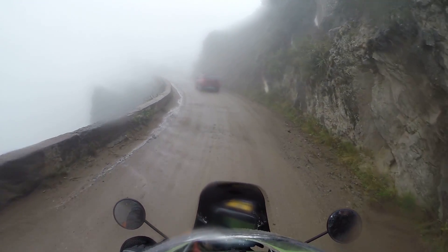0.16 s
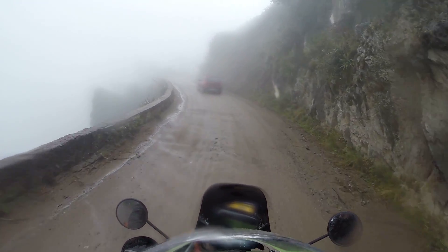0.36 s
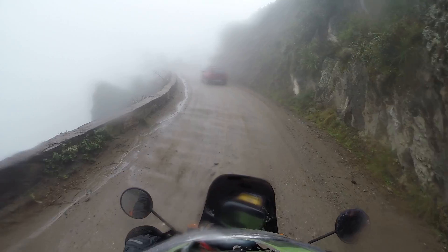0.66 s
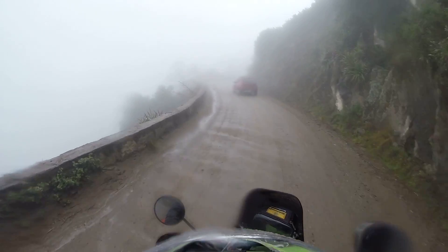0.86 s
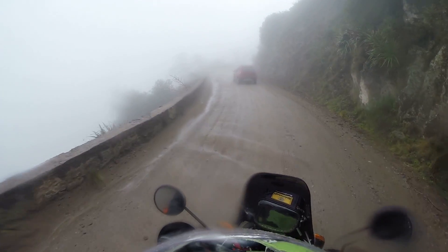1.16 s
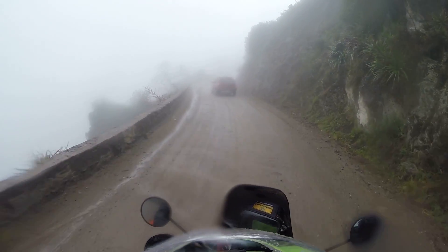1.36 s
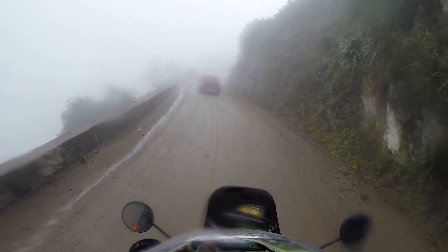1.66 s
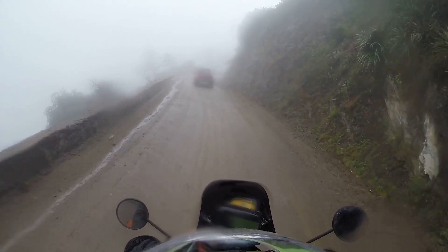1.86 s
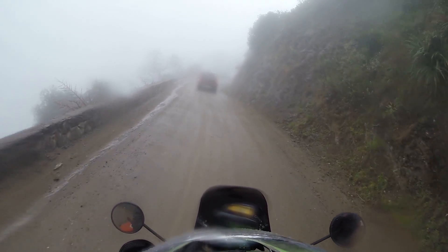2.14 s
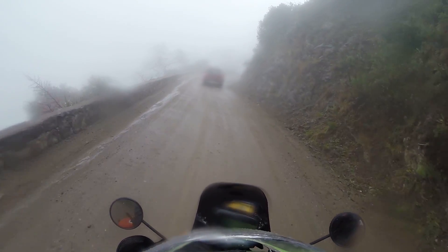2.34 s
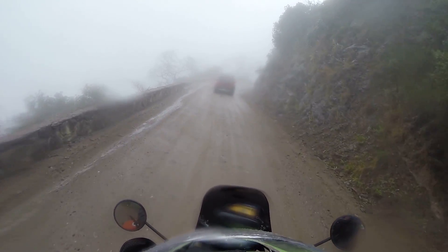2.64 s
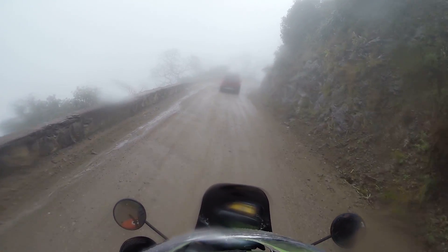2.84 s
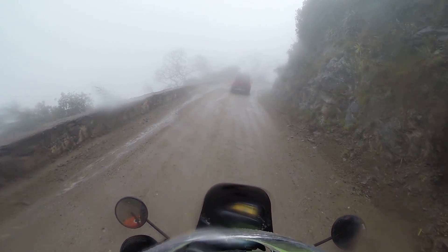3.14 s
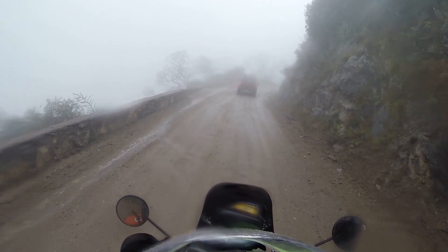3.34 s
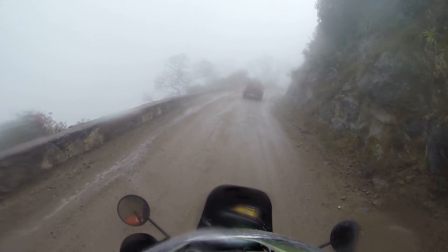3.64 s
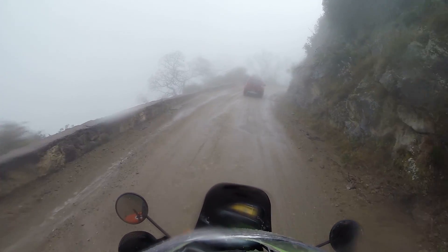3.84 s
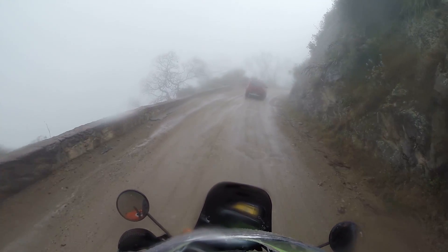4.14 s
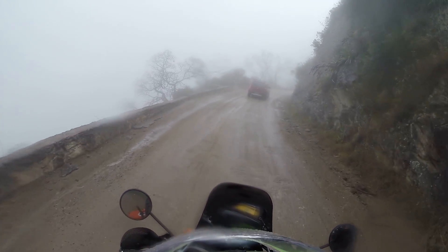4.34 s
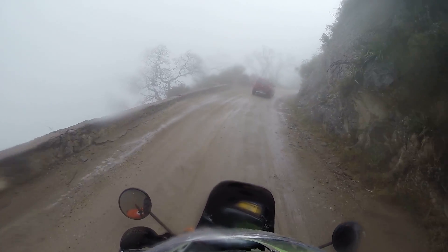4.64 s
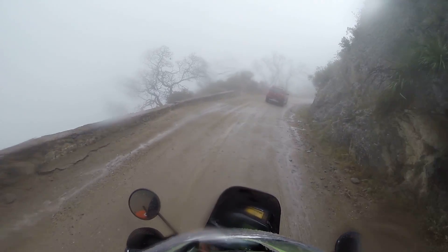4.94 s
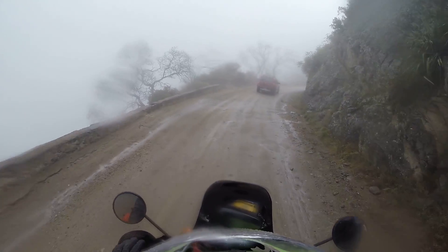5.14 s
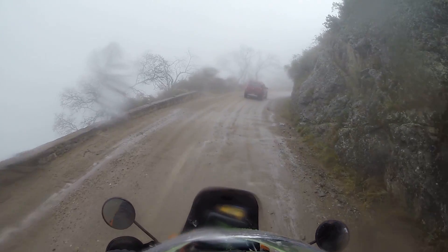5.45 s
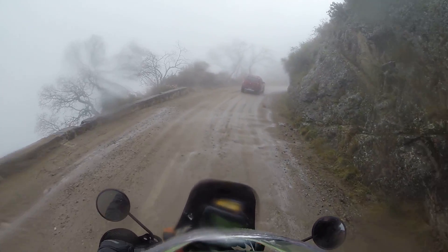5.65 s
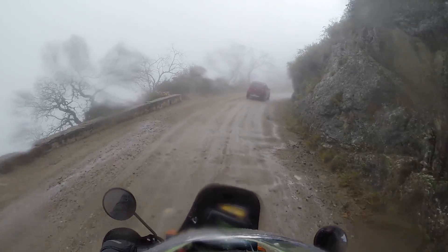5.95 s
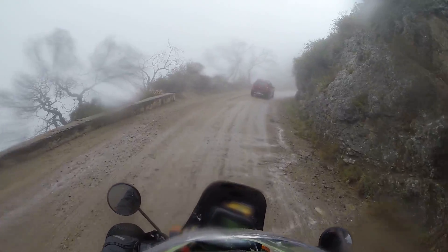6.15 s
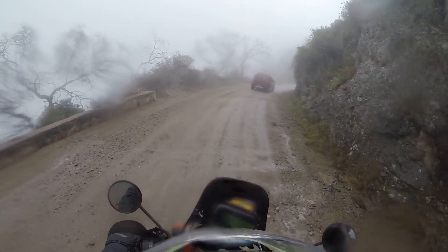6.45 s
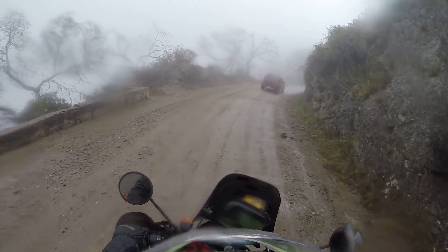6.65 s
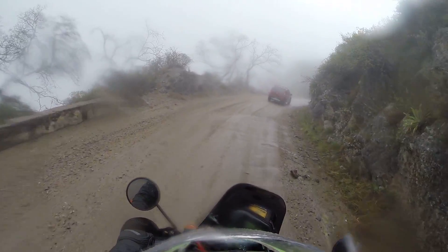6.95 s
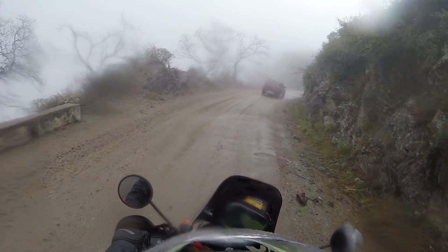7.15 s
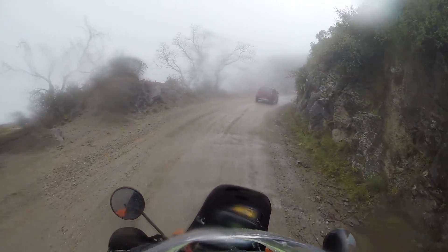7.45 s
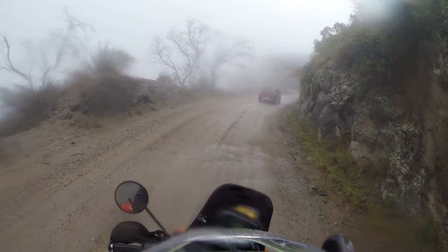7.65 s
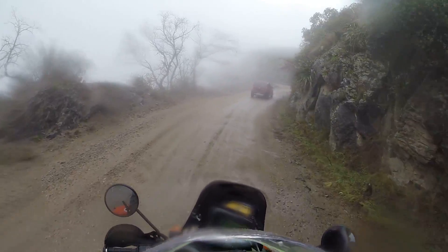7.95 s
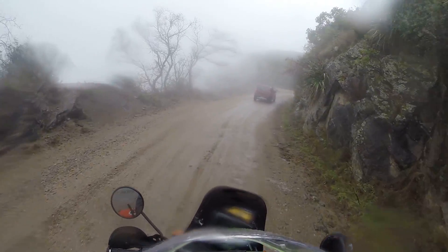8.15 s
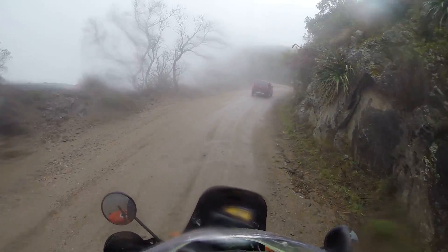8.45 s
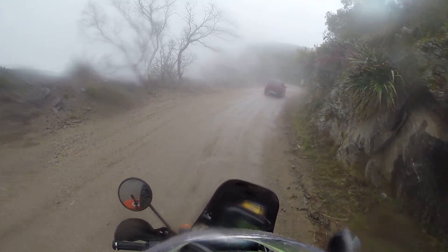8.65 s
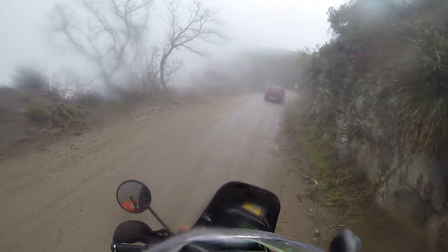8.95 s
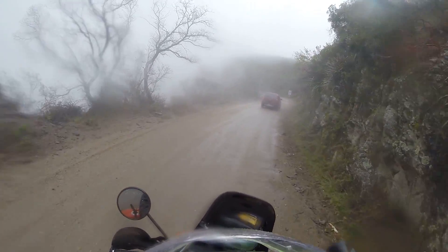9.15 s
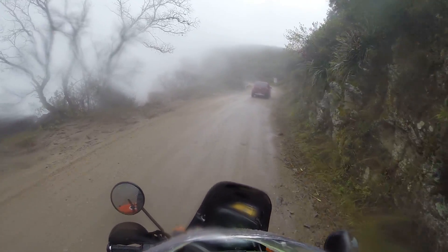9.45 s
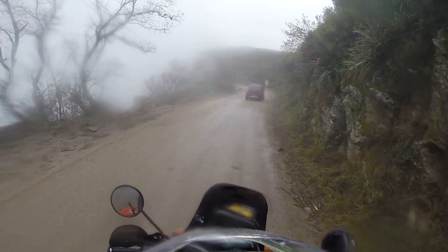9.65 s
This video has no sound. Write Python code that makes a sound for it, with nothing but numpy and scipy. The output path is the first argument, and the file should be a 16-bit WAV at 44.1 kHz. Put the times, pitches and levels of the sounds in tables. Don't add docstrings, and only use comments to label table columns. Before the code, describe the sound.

A camera mounted on a single-cylinder motorcycle picks up constant low thudding rumble from the gravel road, wind whistling through housing gaps, and fine wet hiss. The engine hums weakly, sagging in pitch midway and then recovering. Drops and grit tick on the shell, with a few loud short plastic clacks, the hardest at about 3.6 seconds. The sound is close and boxed in, without echo.

```python
import sys
import numpy as np
from scipy import signal
from scipy.fft import rfft, irfft, next_fast_len
from scipy.io import wavfile
from scipy.ndimage import uniform_filter1d, map_coordinates

SR = 44100
rng = np.random.default_rng(int(sys.argv[2]) if len(sys.argv) > 2 else 0)


def to_wav(sig):
    pcm = np.clip(np.atleast_2d(sig), -1, 1) * 32767
    pcm = np.round(pcm).astype(np.int16)
    wavfile.write(sys.argv[1], SR, pcm.T)


def attenuation_scalar(level_db):
    decades = np.asarray(level_db, float) / 20
    return 10 ** decades


N = 432180

# pitch_hz, width_hz, level_db
MOUNT_MODES = [
    [(49, 5, 0), (60, 6, -8)],
    [(34, 5, 0)],
]
# centre_s, level_db, length_s
JOLTS = [(0.215, -33, 0.096), (0.437, -37, 0.17), (0.707, -41, 0.082), (1.1, -35.5, 0.3),
         (1.686, -32.5, 0.068), (1.91, -43, 0.21), (2.15, -35, 0.16), (2.463, -34.5, 0.14),
         (2.66, -42.5, 0.18), (3.115, -35, 0.079), (3.323, -40, 0.066), (3.492, -53, 0.055),
         (3.68, -30.5, 0.068), (3.88, -32.5, 0.066), (4.18, -35, 0.2), (4.626, -36.5, 0.41),
         (5.12, -36.5, 0.058), (5.493, -37.5, 0.33), (5.83, -36.5, 0.15), (6.13, -35.5, 0.16),
         (6.372, -36, 0.08), (6.614, -37, 0.18), (6.923, -38.5, 0.13), (7.28, -37.5, 0.32),
         (7.85, -36.5, 0.3), (8.056, -36.5, 0.085), (8.36, -33, 0.22), (8.746, -35, 0.21),
         (9.114, -33, 0.49), (9.75, -37, 0.24)]
# centre_s, level_db, length_s
SWAYS = [(0.086, -35.5, 0.16), (0.373, -37, 0.2), (0.67, -56, 0.081), (1.086, -36.5, 0.14),
         (1.59, -35, 0.37), (2.13, -38.5, 0.14), (2.504, -33.5, 0.32), (3.13, -49, 0.41),
         (3.36, -35.5, 0.22), (3.65, -53, 0.083), (4.14, -40.5, 0.31), (4.58, -39, 0.14),
         (5.285, -46, 0.35), (5.576, -41, 0.11), (5.82, -36, 0.17), (6.18, -35.5, 0.19),
         (6.55, -40.5, 0.096), (6.97, -42.5, 0.44), (7.306, -40, 0.21), (7.49, -37, 0.1), (7.92, -37, 0.38),
         (8.084, -41, 0.06), (8.484, -34.5, 0.24), (9.0, -33, 0.29), (9.268, -37, 0.11),
         (9.562, -37.5, 0.24)]
CALM_DB = -49, -50.5
# time_s, firing_rate_hz, level_db, upper_order_bark_db
ENGINE_RIDE = [(0, 29.32, -57.5, -2), (1.2, 29.65, -57.5, -5), (2.2, 28.12, -59, -8.5),
               (3.2, 26.54, -58.5, -5), (4.5, 24.52, -62, -4), (5.3, 24.97, -61, -7), (6.2, 26.02, -65, 1),
               (7.3, 27.35, -66.5, 2.5), (8, 27.68, -66, 6), (9.8, 28.57, -58.5, -3.5)]
# multiple, level_db
FIRING_ORDERS = [(3, -0.5), (4, 0), (5, -15.5), (6, -12), (7, -13), (8, -7.5), (9, -5), (10, -7),
                 (11, -11.5), (12, -14)]
# time_s, gap_wind_db, tyre_spray_db
RIDE = [(0.0, -48, -52.0), (0.58, -50.5, -53.5), (0.98, -48, -52.5), (1.38, -49.5, -53.5),
        (2.37, -44, -54.5), (2.72, -50, -55), (3.18, -53.5, -56.0), (3.48, -49, -55.5),
        (4.08, -53.5, -56.5), (5.37, -51.5, -56.0), (5.58, -48, -55.5), (6.18, -47, -55.5),
        (7.42, -47, -54), (7.66, -44, -54.5), (8.6, -46.5, -53.5), (8.78, -46.5, -54.0),
        (9.8, -45.5, -55.5)]
# centre_s, change_db, length_s
PUFFS = [(0.078, -3, .06), (0.234, 7, 0.085), (.37, 1.5, 0.046), (.68, -2, .13), (1.13, 2, 0.092),
         (1.463, 3, 0.074), (1.595, -7.5, 0.074), (1.694, 4, 0.1), (1.89, -3, .1), (2.037, -5, 0.1),
         (2.36, -0.5, 0.074), (2.593, -7.5, 0.085), (2.907, -6, 0.12), (3.05, 8, 0.14), (3.31, -3, 0.1),
         (4.95, -2, 0.18), (5.327, 2, .08), (5.625, 3, 0.045), (5.695, 4, .04), (5.854, 3.5, 0.098),
         (6.41, -3.5, 0.065), (7.196, -2, 0.08), (7.575, 1.8, 0.17), (8.38, 4, 0.25), (8.569, 3.5, 0.1),
         (8.778, -4, .1), (9.167, -3, 0.22), (9.248, 4.5, 0.067), (9.652, 1.5, 0.066)]
# pitch_hz, density_db (per Hz)
RUMBLE_SPECTRUM = [(35, -35), (60, -3.5), (72, -16), (76, -18.5), (377, -26.5), (524, -31), (621, -32.5),
                   (1100, -33), (1430, -66), (2420, -120)]
# pitch_hz, width_hz, level_db
FRAME_MODES = [(141, 3.9, 7), (526, 22.6, 7.5)]
# pitch_hz, width_hz, level_db
GAP_MODES = [(1122, 86, -10), (1444, 129, 3), (1597, 430, -7.5)]
# pitch_hz, width_hz, level_db
OVERTONE_MODES = [(2400, 790, -6.5), (2919, 195, 3), (3580, 400, -10)]
# centre_s, extra_db, length_s
GRAVEL = [
    (1.03, 3, 0.39),
    (5.33, 6, .08),
    (8.45, 3.5, 0.31),
]
# pitch_hz, density_db (per Hz)
HISS_SPECTRUM = [(600, -17), (1000, -13.5), (1700, -7), (2500, -8.5), (3600, -13.5), (4300, -19.5),
                 (5000, -14.5), (6800, -14.5), (7600, -30.5), (11000, -33), (13300, -35), (14000, -40),
                 (15250, -39), (15400, -90)]
# pitch_hz, width_hz, level_db
PORT_MODES = [(5210, 84, -3.5), (8430, 320, -5), (9500, 220, -1), (10210, 180, 5.5)]
# start_s, peak_db, dull_db, bright_db
TICKS = [(0.0744, -46, -8, -17), (0.154, -36, 9.5, -23), (0.7431, -53, 0, -9), (1.1901, -35.5, -13, -21),
         (1.6101, -46, 0, -7), (1.727, -43, -11, -17), (1.875, -39, -9, -24), (1.982, -46, 11, -23),
         (2.13, -51, 3, -20), (2.535, -35, -12, -28), (2.8793, -40, -17, -18), (2.9237, -48, -8, -12),
         (3.543, -49.5, 0, -6), (3.792, -39, 3, -25), (4.157, -37, -10, -22), (4.2129, -37.5, -8, -23),
         (4.82, -48, -7, -13), (4.9925, -48, 2, -12), (7.496, -50, -3, -5), (8.3516, -35, -18, -38),
         (8.5199, -39, -12, -30), (8.6777, -33, 0, -32), (8.698, -35, -2, -26), (8.892, -43, 0, -16)]
# start_s, peak_db, dull_db, bright_db, dull_note_hz
FACE_HITS = [
    (0.5739, -18.5, -5.5, -32, 2090),
    (2.031, -43, 3, -11, 3900),
    (3.6481, -16, -4.5, -18, 3000),
    (5.181, -30.5, -8, -26, 2450),
    (7.7031, -27.5, 9, -26, 2950),
    (9.7756, -39, -10, -20, 1930),
]
# start_s, peak_db, dull_db, bright_db, dull_note_hz
RIM_HITS = [
    (6.7542, -20, -9, -28, 2900),
    (7.098, -23, -0.5, -26.5, 1470),
    (7.1348, -28, 1.5, -25, 2400),
    (8.7349, -29.5, 3.5, -18, 1900),
    (9.6349, -27, -5, -17.5, 2400),
]
# pitch_hz, width_hz, level_db
SHELL_DULL = [(1450, 450, -5.5), (2450, 800, 0), (3370, 370, 0.5)]
# pitch_hz, width_hz, level_db
SHELL_MID = [(4400, 750, -13), (5830, 1600, -6), (6700, 510, -7)]
# pitch_hz, width_hz, level_db
SHELL_BRIGHT = [(8300, 910, 2.5), (10000, 420, 1.5), (11900, 1400, 1), (13000, 2400, -6), (14600, 1500, -8)]
# pitch_hz, width_hz, level_db
FACE_NOTE = [(5240, 330, 4.3)]
# pitch_hz, width_hz, level_db
RIM_NOTE = [(5330, 600, -2), (6470, 710, -3)]
# start_s, peak_db
KNOCKS = [(0.156, -39), (0.946, -33), (1.045, -34), (1.1278, -32), (1.8162, -31), (1.982, -26.5),
          (4.58, -34), (4.684, -34.5), (5.331, -29), (5.628, -35), (5.842, -35), (6.8472, -30.5),
          (8.319, -36)]
# start_s, peak_db
POTHOLES = [
    (0.896, -34.5),
    (1.701, -46),
    (5.717, -41),
    (8.5, -44.5),
]
# start_s, level_db, pitch_hz
PINGS = [
    (.947, -34, 2350),
    (1.096, -35, 2350),
    (1.1495, -33, 2450),
    (1.965, -38, 2250),
    (2.0322, -31, 2550),
]
# start_s, then a list of pitch_hz, level_db, t60_s
STONE = (3.6492, [(2240, -28.5, 0.045), (2520, -28, 0.029), (2920, -38, 0.023)])


def unit(x):
    return x / np.sqrt(np.mean(x ** 2) + 1e-20)


def curves(rows):
    s, *cols = np.transpose(rows)
    return [np.interp(np.arange(N) / SR, s, c) for c in cols]


def swells(rows, heights):
    t = np.arange(0, N + 100, 100) / SR
    s, _, length = np.transpose(rows)[:, :, None]
    bells = np.exp(-(2 * (t - s) / length) ** 2)
    return np.interp(np.arange(N) / SR, t, heights @ bells)


def wobble(rate):
    knots = rng.standard_normal(int(N * rate / SR) + 4)
    return map_coordinates(knots, [np.arange(N) * rate / SR])


def filtered(x, response):
    m = next_fast_len(N + SR // 2)
    return irfft(rfft(x, m) * response(np.fft.rfftfreq(m, 1 / SR)), m)[:N]


def colour(points):
    hz, db = np.transpose(points)
    return lambda f: attenuation_scalar(np.interp(np.log(f + 1), np.log(hz + 1), db))


def resonances(modes):
    def response(f):
        total = 0
        for k, (c, w, db) in enumerate(modes):
            total = total + (-1) ** k * attenuation_scalar(db) * 1j * f * w / (c * c - f * f + 1j * f * w)
        return total
    return response


def lifted(points, modes):
    return lambda f: colour(points)(f) * (1 + np.abs(resonances(modes)(f)))


def turbulence(patchy_db, top_db=0):
    z = signal.stft(rng.standard_normal(N), nperseg=512)[2]
    field = uniform_filter1d(uniform_filter1d(rng.standard_normal(z.shape), 7, 0), 6, 1)
    depth_db = patchy_db + top_db * np.clip(np.linspace(-2, 2, len(z)), 0, 1)[:, None]
    return signal.istft(z * attenuation_scalar(depth_db * unit(field)), nperseg=512)[1][:N]


def clicks(count, spread_db):
    when, size = rng.random((count, 2)).T
    heights = attenuation_scalar(-spread_db * np.log(1 - .97 * size))
    return np.bincount((when * (N - 1)).astype(int), heights, N)


def mount():
    heave = colour([(3, -5.0), (10, -1.0), (22, -1.5), (30, -30), (60, -59)])
    out = attenuation_scalar(-46.5) * unit(filtered(rng.standard_normal(N), heave))
    for modes, rows, calm_db in zip(MOUNT_MODES, (JOLTS, SWAYS), CALM_DB):
        level = np.sqrt(attenuation_scalar(2 * calm_db) + swells(rows, attenuation_scalar(2 * np.transpose(rows)[1])))
        sway = unit(filtered(rng.standard_normal(N), resonances(modes)))
        power = uniform_filter1d(uniform_filter1d(sway ** 2, size=SR // 12), size=SR // 12)
        out = out + attenuation_scalar(1.0) * level * sway / np.sqrt(np.abs(power) + 0.019)
    return filtered(out, lambda f: 1 / (1 + (f / 66) ** 12))


def engine():
    rate_hz, level_db, bark_db = curves(ENGINE_RIDE)
    turn = 2 * np.pi * np.cumsum(rate_hz * (1 + .004 * wobble(6))) / SR
    tones = 0
    for k, db in FIRING_ORDERS:
        order_db = db + bark_db * (k > 6.5) + 3 * wobble(3.5)
        tones = tones + attenuation_scalar(order_db) * np.sin(round(k) * turn + k * k)
    return attenuation_scalar(level_db) * tones


def wind_rumble(wind_db):
    follows = 0.33
    level_db = -52 + follows * (wind_db - wind_db.mean()) + 0.92 * wobble(3.14)
    return attenuation_scalar(level_db) * unit(filtered(turbulence(patchy_db=0.06), lifted(RUMBLE_SPECTRUM, FRAME_MODES)))


def gap_whistle(wind_db, hiss_db, flutter):
    whistle_db = wind_db + swells(PUFFS, np.transpose(PUFFS)[1]) + 0.54 * wobble(16)
    overtone_db = -1.5 - 0.12 * (whistle_db - wind_db) + 0.56 * (hiss_db - hiss_db.mean())
    eddies = attenuation_scalar(0.19 * flutter + 0.93 * wobble(50)) * unit(turbulence(patchy_db=1.0))
    grit = attenuation_scalar(swells(GRAVEL, np.transpose(GRAVEL)[1])) * unit(clicks(count=4000, spread_db=2.5))
    eddies = eddies + 0.58 * grit

    def low_band(f):
        return resonances(GAP_MODES)(f) * f ** 2 / (f ** 2 + 900 ** 2) / (1 + (f / 2400) ** 6)

    def high_band(f):
        return resonances(OVERTONE_MODES)(f) * f ** 2 / (f ** 2 + 1800 ** 2) / (1 + (f / 4100) ** 8)

    low = unit(filtered(eddies, low_band))
    high = unit(filtered(eddies, high_band))
    return attenuation_scalar(whistle_db - 0.9) * (low + attenuation_scalar(overtone_db - 1.0) * high)


def shell_hiss(hiss_db, flutter):
    noise = attenuation_scalar(0.26 * flutter) * turbulence(patchy_db=1.2, top_db=3.5)
    return attenuation_scalar(hiss_db + 5.0) * unit(filtered(noise, lifted(HISS_SPECTRUM, PORT_MODES)))


def airflow():
    wind_db, hiss_db = curves(RIDE)
    flutter = wobble(22)
    return wind_rumble(wind_db) + gap_whistle(wind_db, hiss_db, flutter) + shell_hiss(hiss_db, flutter)


def spray():
    mist_modes = [(5300, 1500, 0), (9500, 3000, -6), (13000, 3000, -5)]  # Hz, width Hz, dB
    return attenuation_scalar(-52) * filtered(clicks(count=160, spread_db=3.0), resonances(mist_modes))


def shell_hits():
    out, t = np.zeros(N + SR), np.arange(2048) / SR
    f = np.fft.rfftfreq(len(t), 1 / SR)
    light = [(*row, 2800) for row in TICKS]
    blows = [(*row, FACE_NOTE) for row in FACE_HITS + light]
    blows += [(*row, RIM_NOTE) for row in RIM_HITS]
    bright = resonances(SHELL_BRIGHT)(f)
    for s, db, dull_db, bright_db, dull_hz, note in blows:
        crack = rfft(.12 * rng.standard_normal(len(t)) * attenuation_scalar(-60 * t / .004) + (t == 0))
        dull = resonances(sorted(SHELL_DULL + [(dull_hz, 420, 3)]))(f)
        dull = dull / (1 + 1j * f / 4000) ** 2 * (1j * f / (1j * f + 800)) ** 3
        mid = resonances(sorted(note + SHELL_MID))(f) / (1 + 1j * f / 7000) ** 2
        start = round((s + .0013) * SR)
        for shape, part_db in (dull, dull_db + 1.6), (mid, .7), (bright, bright_db + 16.0):
            part = irfft(crack * shape)
            out[start:][:len(t)] += attenuation_scalar(db + part_db) * part / np.abs(part).max()
    return out[:N]


def soft_contacts():
    out, t = np.zeros(N + SR), np.arange(2048) / SR
    for s, db in KNOCKS:
        crunch = attenuation_scalar(db + 10.5 - 60 * t / 0.036) * (1 - np.exp(-t / 0.00069))
        out[round(s * SR):][:len(t)] += crunch * rng.standard_normal(len(t))
    ring = resonances([(1500, 500, 0), (2200, 700, -2), (3000, 700, -3)])
    return filtered(out[:N], lambda f: ring(f) / (1 + 1j * f / 4500) ** 2)


def potholes():
    out, t = np.zeros(N + SR), np.arange(SR // 4) / SR
    push = attenuation_scalar(-60 * t / 0.3) * np.sin(2 * np.pi * 85 * t)
    push = push + .5 * attenuation_scalar(-60 * t / 0.34) * np.sin(2 * np.pi * 142 * t)
    push = push * (1 - np.exp(-t / 0.00065))
    for s, db in POTHOLES:
        out[round(s * SR):][:len(t)] += attenuation_scalar(db) * push
    return out[:N]


def decaying_tones(rows):
    out, t = np.zeros(N + SR), np.arange(2048) / SR
    for s, db, hz, t60 in rows:
        out[round(s * SR):][:len(t)] += attenuation_scalar(db - 60 * t / t60) * np.sin(2 * np.pi * hz * t)
    return out[:N]


def screen_grit():
    return decaying_tones([(s, db, hz, 0.02) for s, db, hz in PINGS])


def ringing_stone():
    start_s, modes = STONE
    return decaying_tones([(start_s, db, hz, t60) for hz, db, t60 in modes])


def scene():
    steady = mount() + engine() + airflow() + spray()
    impacts = shell_hits() + soft_contacts() + potholes() + screen_grit() + ringing_stone()
    return (steady + impacts)[None]


def band_limit(x):
    return signal.sosfilt(signal.butter(12, 16640, fs=SR, output="sos"), x)


def record(dry):
    kept = filtered(dry[0], colour([(15300, 0), (15500, -10), (16400, -14), (16700, -80)]))
    return band_limit(kept[None])


dry = scene()
out = record(dry)
to_wav(out)
```